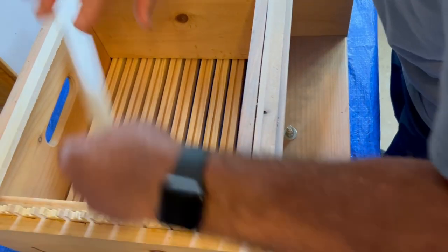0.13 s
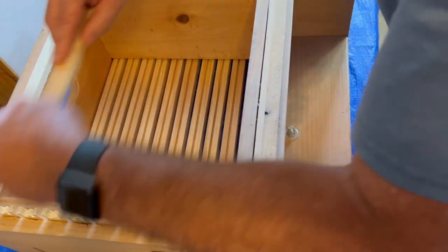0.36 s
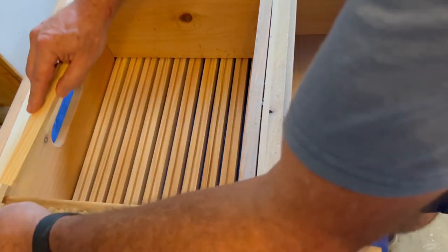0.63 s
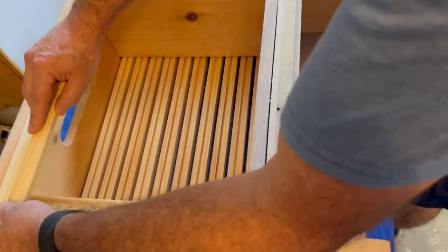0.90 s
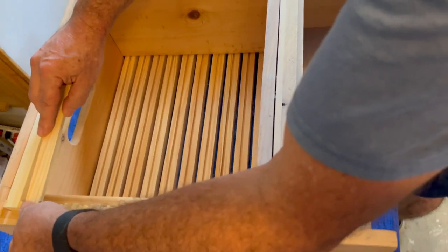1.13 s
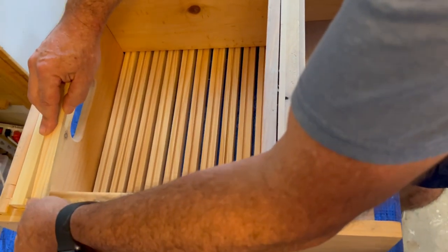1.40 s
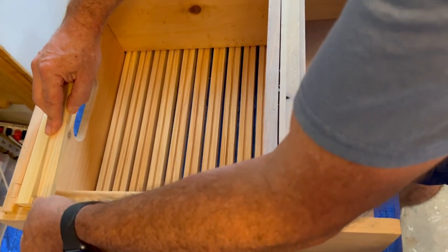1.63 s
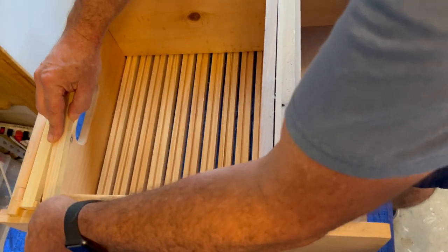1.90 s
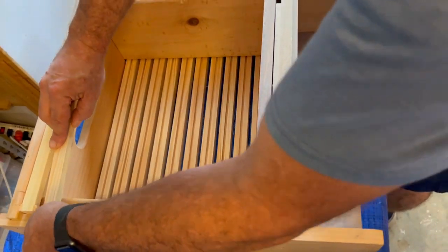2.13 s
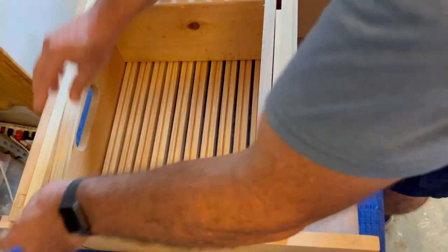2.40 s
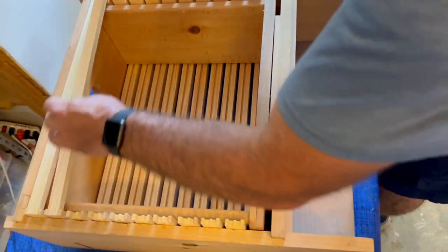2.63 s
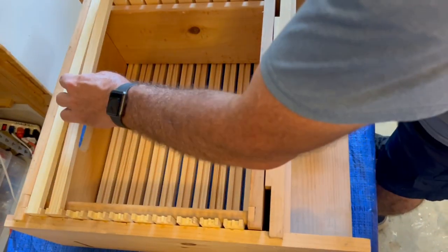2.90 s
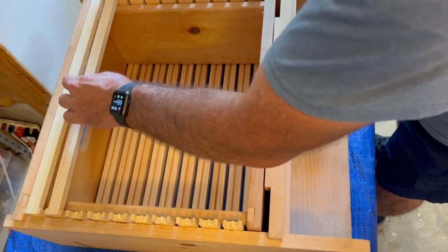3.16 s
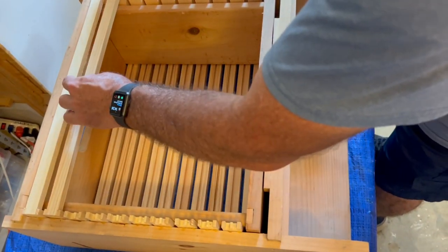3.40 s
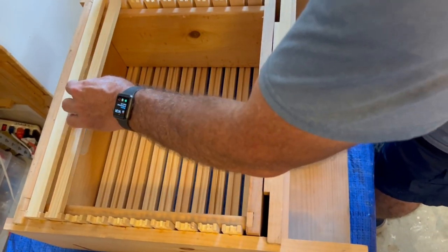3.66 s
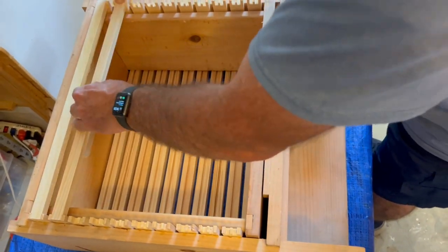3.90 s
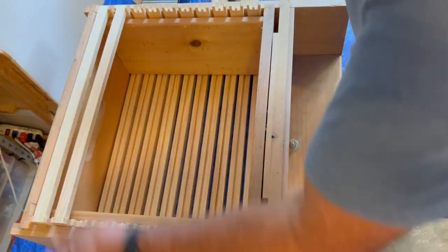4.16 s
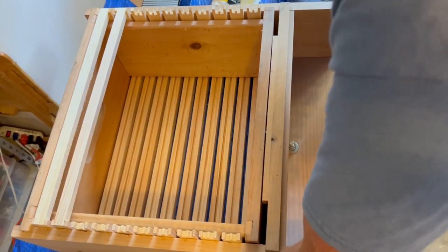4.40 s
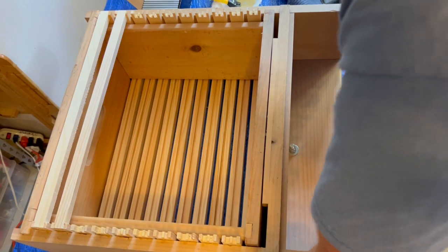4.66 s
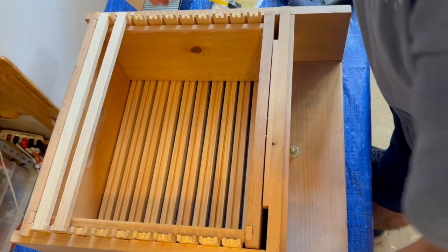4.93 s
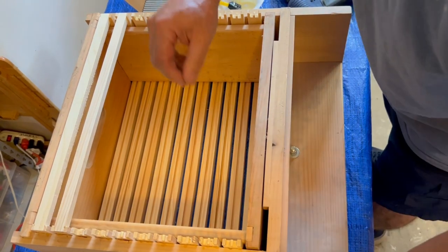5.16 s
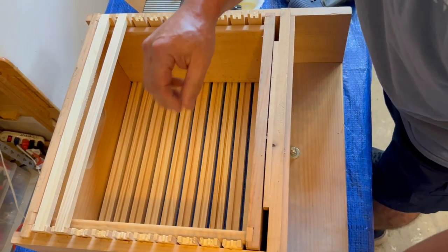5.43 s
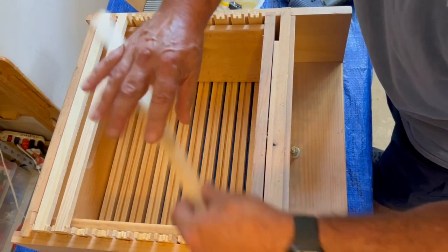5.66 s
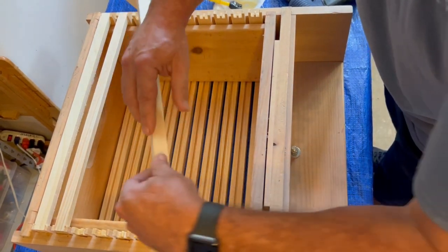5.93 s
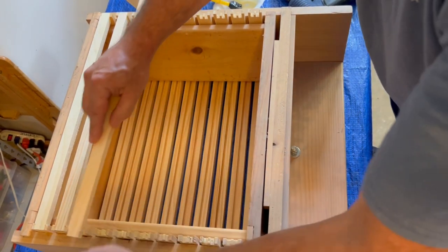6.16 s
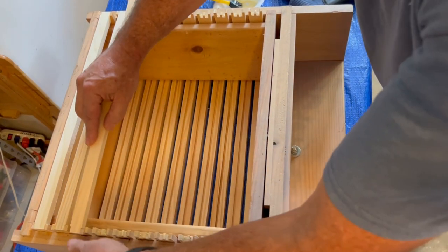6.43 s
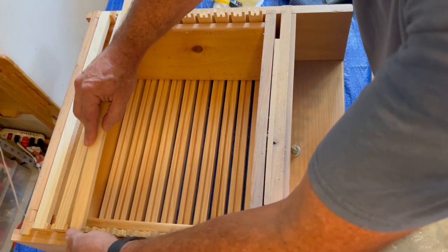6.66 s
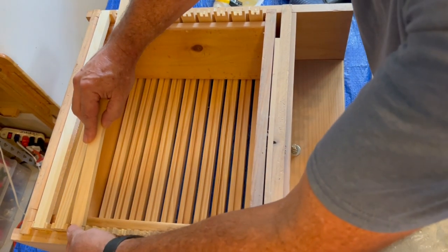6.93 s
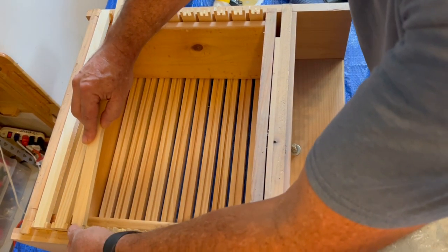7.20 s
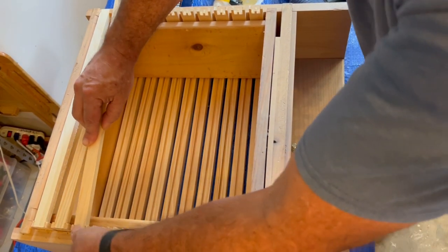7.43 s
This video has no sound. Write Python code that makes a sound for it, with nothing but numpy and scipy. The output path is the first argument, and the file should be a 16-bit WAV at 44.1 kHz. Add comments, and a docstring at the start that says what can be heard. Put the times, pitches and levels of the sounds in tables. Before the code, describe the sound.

Close stereo sound of woodworking by hand. Dry bars slide against a wooden box with brief grainy scrapes and settle with dull thuds, knocks and sharp clacks, sparse at first and loudest just past the middle. The last two seconds hold only small taps and faint rubbing. Behind everything, a steady low drone beats beneath soft rushing air, slightly to the right, in a small room with a short tail.

```python
"""Two motors hum and beat over steady air noise in a small workshop; then dry slides and knocks begin.
Wooden bars are laid into a wooden box jig: each blow rings decaying modes of the box (thud),
the bar (knock, clack) and its edge (tick). Slides mix fibre hiss with tiny slips that ring the wood.
Sparse reflections add the room, and two microphone ports clip hard at full scale."""
import sys
import numpy as np
from scipy import signal
from scipy.fft import rfft, irfft
from scipy.io import wavfile
from scipy.ndimage import uniform_filter1d

SR = 44100
rng = np.random.default_rng(int(sys.argv[2]) if len(sys.argv) > 2 else 0)


def waveform_to_disk(signal):
    """Save audio, clipped to [-1, 1], as 16-bit WAV at the path in sys.argv[1]."""
    frames = np.transpose(np.atleast_2d(signal))
    scaled = np.clip(frames, -1, 1) * 32767
    samples = np.round(scaled).astype(np.int16)
    wavfile.write(sys.argv[1], SR, samples)


def invert_db(x):
    """Field ratio 10**(x/20) for x, a level in decibels (scalar or array-like)."""
    u = np.asarray(x, float) / 20
    return 10 ** u


N = 333396


def evened(x):
    """Scales to rms 1."""
    return x / np.sqrt(np.mean(x ** 2) + 1e-20)


def read(points, hz):
    """Reads a curve on a log-frequency axis."""
    f, value = np.transpose(points)
    return np.interp(np.log(hz + 1), np.log(f + 1), value)


def add(mix, start_s, sound):
    """Mixes a sound in at its start time."""
    part = mix[:, round(start_s * SR):][:, :sound.shape[1]]
    part += sound[:, :part.shape[1]]


# ringing modes of box and bars: [pitch_hz, level_db (relative), t60_s]
WOOD_MODES = [(88, -18, 0.3), (134, 3, 0.12), (172, -14, 0.18), (206, -3, 0.072), (267.7, 3, 0.088),
              (325.2, 1.5, 0.11), (389.6, 4, 0.057), (477, -1, 0.025), (588, 3, 0.025), (667, 0.5, 0.026),
              (787.4, 1.5, 0.029), (952, -0.5, 0.02), (1234, 2.5, 0.012), (1717, 1, 0.0053),
              (2174, -0.5, 0.008), (2680, -4, 0.011), (2979, -2, 0.0031), (3863, -2.5, 0.0029),
              (4840, -3.5, 0.0019), (7660, -3.5, 0.00053), (12490, -13.5, 0.0011)]


def ring(t, luck, favour_db, held_s):
    """The modes set going at one spot; high modes reach the two microphones out of step."""
    hz, db, t60 = (column[:, None] for column in np.transpose(WOOD_MODES))
    size, skew, detune = luck[:, :, None]
    decay_db = 60 * t / (t60 + held_s)
    level = invert_db(db + favour_db + 1.5 * size - decay_db) / np.sqrt(t60)
    phase = 2 * np.pi * hz * (1 + 0.015 * detune) * t
    apart = skew * 0.65 * hz / (hz + 900)
    level[1::2] *= -1  # neighbouring modes move in opposite sense, which fills the valleys between them
    return level * np.sin([phase + apart, phase - apart])


# borders of thud, knock, clack and tick: [pitch_hz]
PART_EDGES_HZ = [70, 450, 1150, 5600, 20000]
# how modes fade away from the favoured pitch, one entry per part: [slope (dB per octave)]
FAVOUR_SLOPES = [-20, -12, -11, -9]


def blow(thud_db, hard_db, edge_db, spot_hz, luck, chatter):
    """Rough contact rings four parts of the wood; returns the near sound and an evener one for the walls."""
    rise_s, snap_s, rattle_s, rattle_share = 0.0017, 0.0012, 0.007, 0.04  # contact times at firm_db
    firm_db, slowing = -18.5, 0.12  # clacks softer than firm_db stay in contact longer
    swell_s = 0.0034  # late swell of the box
    clean_share = 0.8  # power of knock and clack rung by one clean push, the rest by chatter

    t, hz = np.arange(SR // 7) / SR, np.transpose(WOOD_MODES)[0]
    part = np.digitize(hz, PART_EDGES_HZ) - 1
    spot = np.digitize(spot_hz, PART_EDGES_HZ) - 1
    octaves = abs(np.log2(hz / spot_hz))
    favour_db = (FAVOUR_SLOPES[spot] * octaves * (part == spot))[:, None]
    modes = ring(t, luck, favour_db, 0)
    pushed = ring(t, luck, favour_db, np.log(1000) * snap_s)

    clack_db = thud_db + hard_db
    # the knock follows force and hardness, louder if struck where it rings
    knock_db = thud_db - 2 + 0.5 * hard_db + 9.5 * (spot == 1)
    pace = invert_db(slowing * (clack_db - firm_db))
    touch = t[:len(chatter)] * pace
    release = np.exp(-touch / snap_s) + rattle_share * np.exp(-touch / rattle_s)
    contact = chatter * (1 - np.exp(-touch / rise_s)) * release

    near = walls = 0
    for k, db in enumerate([thud_db, knock_db, clack_db, clack_db + edge_db]):
        # small parts radiate no bass
        low_cut = signal.butter(2, 0.55 * PART_EDGES_HZ[k], "high", fs=SR, output="sos")
        rung = signal.sosfilt(low_cut, modes[:, part == k].sum(1))
        if k == 0:
            sound = rung = rung * (1 - np.exp(-t / swell_s)) ** 2
        else:
            sound = signal.fftconvolve(rung, contact[None], axes=1)[:, :len(t)]
        if k in (1, 2):
            onset = (1 - np.exp(-t * pace / rise_s)) ** 2
            push = signal.sosfilt(low_cut, pushed[:, part == k].sum(1) * onset)
            sound = np.sqrt(clean_share) * evened(push) + np.sqrt(1 - clean_share) * evened(sound)
        # level is the early power of both channels together
        early = sound[:, :600 if k else 1200]
        gain = invert_db(db) / np.sqrt(2 * np.mean(early ** 2))
        near = near + gain * sound
        walls = walls + gain * rung * np.linalg.norm(sound) / np.linalg.norm(rung)
    return np.vstack([near, walls])


# knocks and taps: [start_s, thud_db (force on the box), hard_db (clack over thud),
# edge_db (tick over clack), spot_hz (pitch that the struck spot favours)]
BLOWS = [(0.4222, -65, 3, 6, 110), (0.9674, -40.5, -16.5, -8, 119), (1.1146, -42, -12, -7.5, 196),
         (1.1747, -38, -7.5, 0.5, 170), (1.3694, -36.5, -24, -19, 170), (1.521, -36, -34, -8, 166),
         (1.816, -22.5, -15.5, -10.5, 134), (1.8164, -46, 7, -12, 3780), (1.9541, -36.5, -14.5, -11, 252),
         (2.1059, -30.5, -11, -1.5, 167), (2.2805, -34.5, -25, -13.5, 172), (3.0005, -42.5, -10, -14, 960),
         (3.12, -41, -14.5, -2, 207), (3.253, -33.5, -10.5, -5, 215), (3.2851, -34, -13.5, -12, 246),
         (3.5414, -38.5, -12, -10, 830), (3.7821, -18.5, -42, 12, 157), (3.842, -37.5, -1, -0.5, 127),
         (3.9, -38, -11.5, -26.5, 970), (4.0248, -38, -24.5, -3.5, 1010), (4.4306, -25.5, -23, -18, 127),
         (4.4514, -41.5, 26, -25, 2310), (4.4665, -48, 21, -19.5, 1930), (4.5725, -26, -10, -10.5, 176),
         (4.5945, -28, 0.5, -23.5, 1730), (4.649, -32.5, -19.5, 3.5, 583), (4.711, -39.5, -22.5, 12.5, 226),
         (4.7636, -36, -23, -4, 164), (5.27, -22.5, 0.5, -20, 182), (5.3722, -26, -4, -1, 640),
         (5.3725, -36, 26, -17.5, 3103), (5.374, -17, 1, -12, 1160), (5.3739, -52.5, 28, 12, 6700),
         (5.452, -26, -8.5, -22, 206), (5.5186, -22.5, 3.5, -13, 584), (5.56, -29, -1.5, -5, 394),
         (6.3842, -45, -6, -5.5, 329), (7.1254, -40, -35.5, -6, 215), (7.2579, -37, -15.5, -4, 158),
         (7.4586, -45.5, 0, -3, 400)]


def blows():
    """Every knock and tap of the bars: two near channels, two for the walls."""
    out = np.zeros((4, N))
    luck = rng.standard_normal((len(BLOWS), 3 * len(WOOD_MODES) + 2000))
    for (start_s, *settings), draw in zip(BLOWS, luck):
        chatter, mode_luck = draw[:2000], draw[2000:].reshape(3, -1)
        add(out, start_s, blow(*settings, mode_luck, chatter))
    return out


def noise(spectrum, same, patchy_db):
    """Two-channel random short-time spectra with drifting patches."""
    frames, hz = N // 256 + 5, np.fft.rfftfreq(1024, 1 / SR)
    a, b, c, d, patches = rng.standard_normal((frames, 513, 5)).T
    patches = uniform_filter1d(patches, size=10, axis=0)  # across frequency
    patches = evened(uniform_filter1d(patches, size=8, axis=1))  # across time
    like = np.clip(read(same, hz), -1, 1)[:, None]
    left, other = a + 1j * b, c + 1j * d
    z = np.array([left, like * left + np.sqrt(1 - like ** 2) * other])
    z *= invert_db(read(spectrum, hz)[:, None] + patchy_db * patches)
    return evened(signal.istft(z, nperseg=1024, noverlap=768)[1][:, :N])


# slides of bars and hands over the wood: [start_s, length_s,
# level_db (the stronger of hiss and rung wood), pressure (0-1, brushing to scraping)]
SLIDES = [(0.249, 0.025, -48, 0.3), (0.271, 0.087, -57, 0.2), (1.167, 0.08, -53, 0.8),
          (1.962, 0.065, -50, 0.6), (2.014, 0.069, -52.5, 0.5), (2.226, 0.062, -50.5, 0.65),
          (2.29, 0.12, -40.5, 0.68), (2.373, 0.13, -55, 1), (3.231, 0.026, -45.5, 1),
          (3.621, 0.05, -43.5, 0.72), (3.713, 0.12, -43, 0.67), (3.973, 0.065, -42, 0.86),
          (4.416, 0.045, -43.5, 0.56), (4.531, 0.069, -32.5, 0.51), (4.646, 0.12, -50.5, 0.9),
          (4.766, 0.17, -55, 0.51), (4.853, 0.066, -48, 0.38), (4.912, 0.072, -51, 0.3),
          (4.975, 0.23, -46.5, 0.22), (5.157, 0.17, -44.5, 0.27), (5.788, 0.17, -54.5, 0),
          (6.011, 0.042, -47, 0.2), (6.033, 0.15, -62.5, 0), (7.335, 0.11, -49.5, 0.64),
          (7.465, 0.088, -50.5, 1)]
# colour of the fibre hiss: [pitch_hz, density_db (relative, per Hz)]
HISS = [(900, -52.5), (1500, -13.5), (4500, -5.5), (7000, -7.5), (10000, -12.5), (14500, -16.5),
        (16000, -33.5)]


def slides():
    """Grainy hiss of fibres, and dense tiny slips that ring the wood the harder it is pressed."""
    grit_db, judder_db = 2.5, 1.8  # quick grain and slower unevenness of a stroke
    slips_per_s, slip_spread_db = 900, 3
    press_span_db = 50  # from brushing to scraping, rung wood gains this much on the hiss

    fine, coarse = (evened(uniform_filter1d(rng.standard_normal(N), size=n)) for n in (60, 700))
    grain = invert_db(grit_db * fine + judder_db * coarse)
    likeness = [(1000, 0.8), (4000, 0.35), (8000, 0.8)]  # Hz, left-right likeness
    hiss = noise(HISS, likeness, 4) * evened(grain)

    slip_size = invert_db(slip_spread_db * np.minimum(rng.exponential(1, N), 4))
    slipping = rng.random(N) < slips_per_s / SR
    slips = slip_size * slipping * rng.choice([-1, 1], N) * invert_db(judder_db * coarse)
    wood = ring(np.arange(8000) / SR, rng.standard_normal((3, len(WOOD_MODES))), 0, 0).sum(1)
    body = evened(signal.oaconvolve(slips[None], wood, axes=1)[:, :N])

    out = np.zeros((2, N))
    for start_s, length_s, level_db, pressure in SLIDES:
        start, count = round(start_s * SR), round(length_s * SR)
        lean_db = press_span_db * (np.clip(pressure, 0, 1) - 0.5)
        brushed = invert_db(level_db - max(lean_db, 0)) * hiss[:, start:start + count]
        scraped = invert_db(level_db + min(lean_db, 0)) * body[:, start:start + count]
        stroke = brushed + scraped
        fade = signal.windows.tukey(count, 0.7)[:stroke.shape[1]]
        add(out, start_s, stroke * fade)
    return out


# motor lines, before the lean to the right: [pitch_hz, level_db (rms)]
MOTORS = [(56.515, -47), (58.96, -52.5)]
# wavering machine tones, before the lean to the right: [pitch_hz, level_db (rms)]
TONES = [(201, -54.5), (300, -61), (1238, -69)]
# colour of the air noise: [pitch_hz, density_db (relative, per Hz)]
AIR = [(45, -39), (76, -4), (298, -13), (830, -20), (960, -25.5), (1300, -22), (1630, -31), (10500, -57),
       (13400, -49.5), (16000, -79)]
# how alike left and right are, here and in the workshop: [pitch_hz, likeness (-1 to 1)]
LIKENESS = [(60, 1), (180, 0.93), (550, 0.46), (1650, -0.26), (15000, 0.8)]


def machines():
    """Steady motor lines that beat, narrow wavering tones, and broad air noise."""
    beat_s, air_db = 0.21, -48.5  # when the motors first swell together; rms of the air
    t = np.arange(N) / SR
    hum = 0
    for hz, db in MOTORS:
        hum = hum + np.sqrt(2) * invert_db(db) * np.cos(2 * np.pi * hz * (t - beat_s))
    r = np.exp(-np.pi * 7 / SR)  # each tone is a few Hz wide
    for hz, db in TONES:
        drive = rng.standard_normal(N) + 1j * rng.standard_normal(N)
        waver = signal.lfilter([1], [1, -2 * r, r * r], drive)
        hum = hum + invert_db(db) * evened((waver * np.exp(2j * np.pi * hz * t)).real)
    return hum + invert_db(air_db) * noise(AIR, LIKENESS, 2.0)


# decay of the workshop: [pitch_hz, t60_s]
ROOM_DECAY = [(120, 0.41), (500, 0.24), (2000, 0.42), (12000, 0.15)]


def workshop(x):
    """Sparse reflections of random sign, each band dying at its own speed; the left channel feeds both."""
    taps = np.zeros((2, SR // 2))
    at = np.arange(200, SR // 2 - 20, 20) + rng.integers(0, 20, (2, (SR // 2 - 201) // 20))
    np.put_along_axis(taps, at, rng.choice([-1., 1.], at.shape), 1)
    hz, t, z = signal.stft(taps, SR, nperseg=256)
    like = np.clip(read(LIKENESS, hz) + 0.56, 0, 1)[:, None]  # bass arrives alike at both microphones
    z[1] = like * z[0] + np.sqrt(1 - like ** 2) * z[1]
    decay_db = -60 * t / read(ROOM_DECAY, hz)[:, None]
    colour_db = read([(150, 4.5), (1500, 0.5), (9000, -1.0)], hz)[:, None]
    tail = signal.istft(z * invert_db(decay_db + colour_db), SR, nperseg=256)[1]
    return signal.fftconvolve(x[:1], tail / np.linalg.norm(tail[0]), axes=1)[:, :N]


def scene():
    """Wood sounds with their room, over the machines, which stand to the right."""
    near, walls = np.split(blows(), 2)
    rub = slides()
    room = invert_db(-6.5) * workshop(walls + invert_db(-3) * rub)
    lean = invert_db(np.array([[-0.6], [0.6]]))
    return near + rub + room + machines() * lean


def top_cut(x):
    """Nothing passes above the cut-off."""
    return signal.sosfilt(signal.butter(12, 16050, fs=SR, output="sos"), x)


# drift between the two ports: [pitch_hz, lead_rad (how far the left port leads)]
PORT_PHASE = [(100, .13), (3500, .9), (7200, 0), (10300, -np.pi), (13100, -2 * np.pi), (15000, -7.3)]
# balance of the two ports: [pitch_hz, lean_db (how much louder the left port is)]
PORT_LEAN = [(2500, 0), (5500, 5.5), (9000, -1.5)]


def record(dry):
    """Two ports hear the same top treble but drift a whole cycle out of step in it; bass cut, hard overload."""
    hz = np.fft.rfftfreq(N, 1 / SR)
    left, right = rfft(dry)
    middle = left + right
    side = (left - right) / (1 + (hz / 8000) ** 8)  # the difference fades in the top treble
    lean_db = np.outer([0.5, -0.5], read(PORT_LEAN, hz))
    lead_rad = np.outer([0.5, -0.5], read(PORT_PHASE, hz))
    spectra = np.array([middle + side, middle - side]) / 2
    ports = irfft(spectra * invert_db(lean_db) * np.exp(1j * lead_rad), N)
    bass_cut = signal.butter(4, 45, "high", fs=SR, output="sos")
    mix = np.clip(signal.sosfilt(bass_cut, ports), -1, 1)
    return top_cut(mix)


dry = scene()
out = record(dry)
waveform_to_disk(out)
```